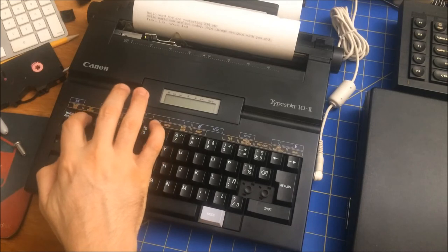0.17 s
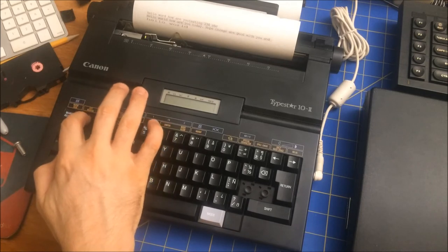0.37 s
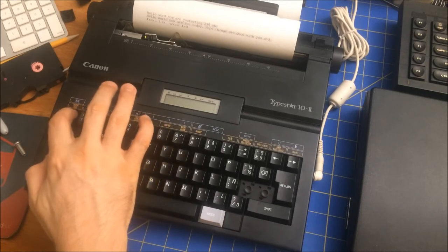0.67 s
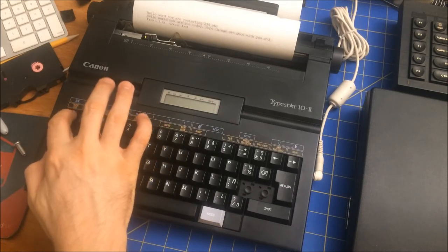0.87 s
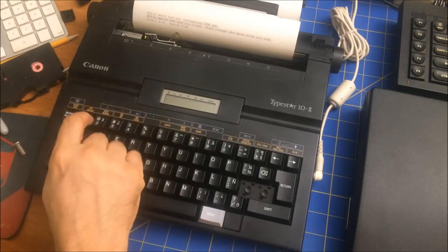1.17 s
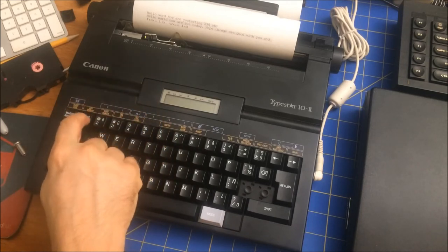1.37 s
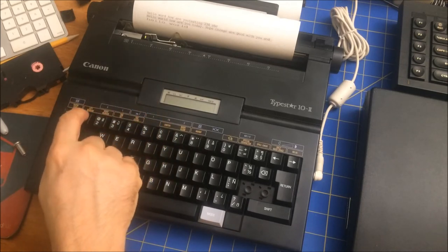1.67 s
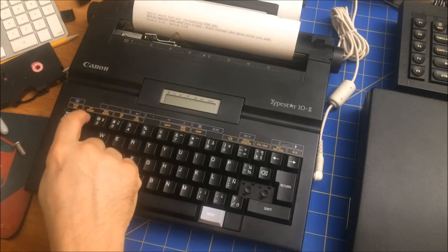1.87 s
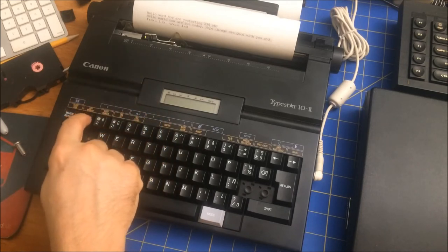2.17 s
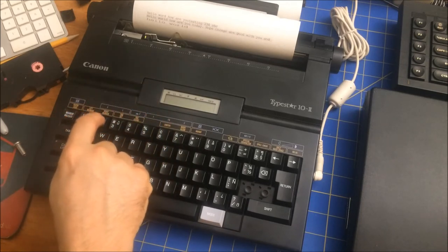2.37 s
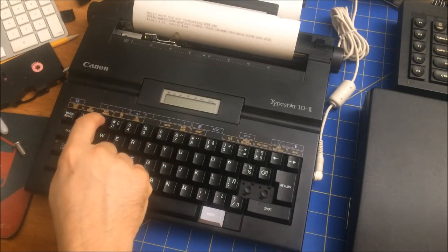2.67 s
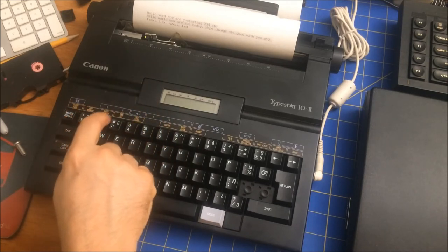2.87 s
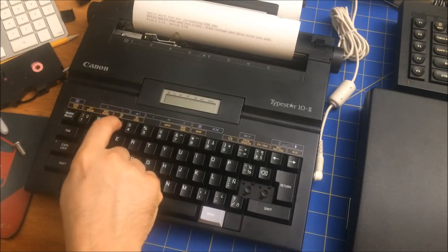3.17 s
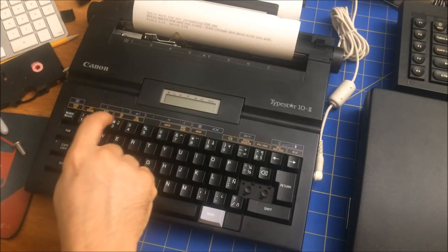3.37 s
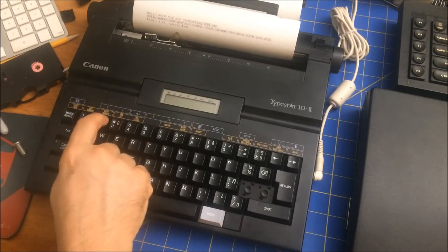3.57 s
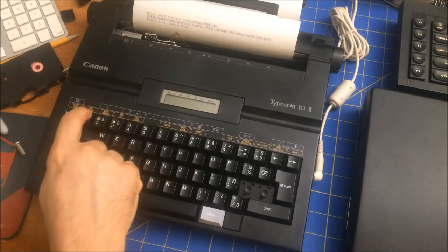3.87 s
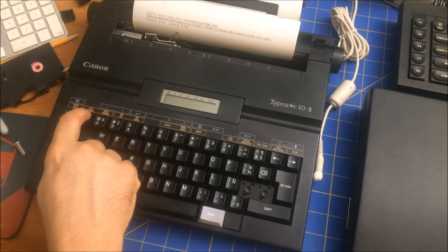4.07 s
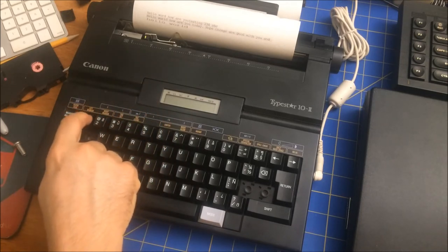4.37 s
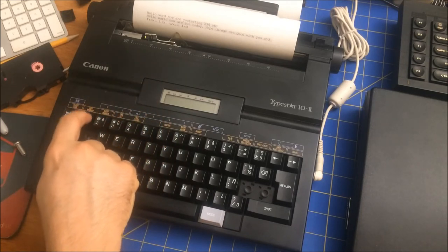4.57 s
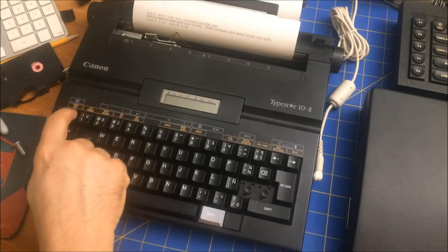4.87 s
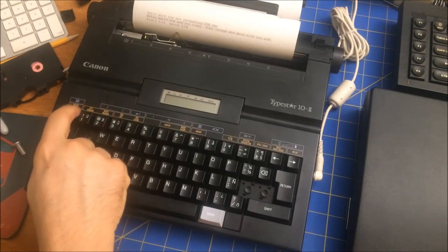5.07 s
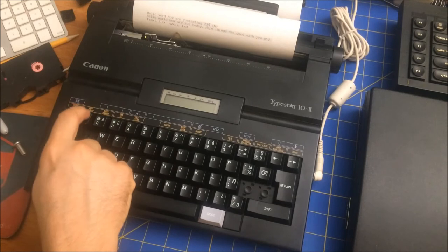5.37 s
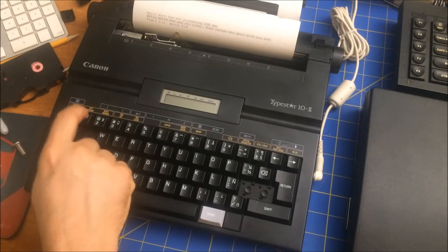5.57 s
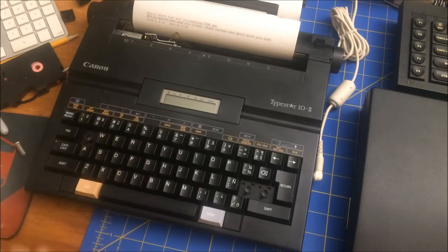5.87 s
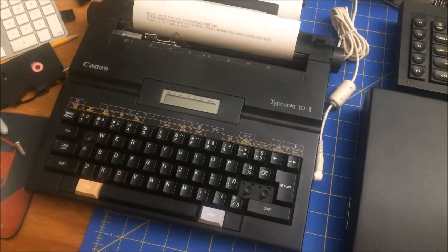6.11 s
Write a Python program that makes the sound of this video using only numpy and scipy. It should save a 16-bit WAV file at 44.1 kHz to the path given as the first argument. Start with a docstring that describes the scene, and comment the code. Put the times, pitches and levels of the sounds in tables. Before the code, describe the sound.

Twenty-two single key presses on a light plastic keyboard, close to a phone microphone. The downstrokes are short, boxy and midrange, with a little desk thump; the releases are small dry clicks, sometimes nearly as loud as the press. The pace begins quick, slows to about three presses a second or fewer, then tightens into closer, irregular taps. The room is small and fairly dry, with low hum and slight hiss.

```python
"""In a small quiet room, one finger works the keys of a plastic electronic typewriter on a desk, close to a phone.
Each press: the rubber dome gives way, the stem slides, the key hits bottom and thuds into case and desk.
On release the cap snaps up against its stop, a few times after a faint knock as the finger lets go.
Contacts are noise bursts filtered by the modes of the struck parts; thuds are modes rung by a soft push.
A brief diffuse tail answers the keys, over a faint low hum and hiss of coloured noise."""
import sys
import numpy as np
from scipy import signal
from scipy.fft import rfft, irfft
from scipy.io import wavfile
from scipy.ndimage import uniform_filter1d

SR = 44100
rng = np.random.default_rng(int(sys.argv[2]) if len(sys.argv) > 2 else 0)


def dump_mix(stems):
    """Bounce the given channels to the path in sys.argv[1] as a 16-bit WAV at rate SR."""
    frames = np.atleast_2d(stems).T  # one column per channel
    limited = np.clip(frames, -1, 1)  # hard clip at full scale
    pcm = np.round(limited * 32767).astype(np.int16)
    wavfile.write(sys.argv[1], SR, pcm)


N = 275184

# The key hits bottom. Each row: time in seconds, strength in dB, hardness in dB, fizz over the strength in dB,
# rattle decay constant in ms, peak level of the thud in the desk top in dB, and of that in the base in dB.
BOTTOM_HITS = [(0.097, -46, -5, -22, 1.6, -59, -64), (0.298, -35.5, -13, -50, 2.5, -54.5, -53.5),
               (0.483, -37, 0, -34.5, 6.6, -59, -52), (0.827, -31, -3, -22, 5.4, -45, -44),
               (1.0, -29, -2, -25, 6.8, -47, -41.5), (1.529, -32, 4, -33, 8.4, -48, -43),
               (1.913, -28.5, -2.2, -29, 8.2, -48, -46), (2.251, -29.5, 7, -20, 8.8, -55, -42),
               (2.593, -30.5, -1.5, -48, 4.8, -53, -48), (2.911, -31.5, 0, -53, 4.5, -52, -48.5),
               (3.222, -34.5, 4, -52, 6.9, -50, -53), (3.391, -36, 7.5, -23, 4.8, -46.5, -51),
               (3.643, -32.5, 4, -36, 5.2, -56, -48), (3.793, -31, -1.2, -27, 2, -62, -60),
               (4.119, -30, 3, -30.5, 2.7, -53.5, -45.5), (4.315, -35.5, -0.5, -55, 6.5, -57, -60),
               (4.506, -35, -1, -49, 4.4, -60, -59), (4.666, -36.5, 1.1, -30, 2.4, -56.5, -48),
               (4.976, -33, 1.5, -23, 4.1, -48, -41.5), (5.146, -33.5, -5, -18, 4.5, -52, -45.5),
               (5.425, -31.5, 1.7, -30, 5.6, -44, -44.5), (5.64, -32.5, 4.5, -43, 5.3, -43.5, -43)]
# How the hardness of a soft contact tilts its spectrum. One share of the hardness (dB per dB) for each part:
# case, plate, keycap, stem, tick, fizz.
SOFT_HARDNESS_SHARE = (0, 0.091, 0.4, 0.72, .9, 1.2)


def undb(db):
    """Decibels are twenty times the logarithm of an amplitude ratio; this inverts them."""
    return 10 ** (np.asarray(db) / 20)


def decay(t, t60):
    """Exponential damping: the amplitude falls by 60 dB in t60 seconds."""
    return np.exp(-np.log(1000) * t / t60)


def gains(table, size):
    """Frequency response: gain per FFT bin from (Hz, dB) points joined on a log-frequency axis."""
    hz, db = np.transpose(table)
    bin_hz = np.arange(size // 2 + 1) * SR / size
    return undb(np.interp(np.log(bin_hz + 1), np.log(hz), db))


def shape(x, table):
    """Linear filtering: a product of spectra colours a noise by (Hz, dB) points."""
    return irfft(rfft(x) * gains(table, len(x)), len(x))


def ring(modes, t, scatter_db, detune):
    """Modal superposition: an impulse response is a sum of damped sines, here scaled to unit energy."""
    hz, db, t60 = np.transpose(modes)[:, :, None]
    # mode strengths and pitches vary a little at random from one contact to the next
    strength_shift, pitch_shift = rng.standard_normal((2, len(modes), 1))
    sines = np.sin(2 * np.pi * hz * (1 + detune * pitch_shift) * t)
    fade = decay(t, np.maximum(t60, .004))
    x = np.sum(undb(db + scatter_db * strength_shift) * fade * sines, axis=0)
    return x / np.linalg.norm(x)


def part(modes, dense_db, t60, t, size):
    """Modal density: spectra of a part's ring (listed modes plus a dense thicket) and of its smooth colour."""
    first_hz, first_db, _ = modes[0]
    last_hz, last_db, _ = modes[-1]
    colour = [(first_hz * 0.47, -40), (first_hz * 1.145, first_db - 4)]
    colour = colour + [mode[:2] for mode in modes]
    colour = colour + [(last_hz * 1.054, last_db - 4), (last_hz * 1.163, -40)]
    thicket = shape(rng.standard_normal(len(t)), colour) * decay(t, t60)
    x = ring(modes, t, scatter_db=1.0, detune=0.013)
    x = x + undb(dense_db) * thicket / np.linalg.norm(thicket)
    edges = [0.84 * first_hz, 1.247 * last_hz]  # a part radiates little outside its own modes
    band = signal.butter(4, edges, "band", fs=SR, output="sos")
    struck = rfft(signal.sosfilt(band, x), size)
    rubbed = gains(colour, size)  # loose rubbing excites the smooth colour
    return struck, rubbed * np.linalg.norm(struck) / np.linalg.norm(rubbed)


def contacts(times, levels_db, rattles_ms, scrapes_db, rise_share, grain_db, clump_db, settle_db, settle_ms, scrape_ms):
    """Source and resonator: a swelling scrape, a rattle of tiny uneven knocks and a fitful settling excite each part."""
    # Modes of each part. Each row: frequency in Hz, relative level in dB, t60 in seconds (at least 0.004 is used).
    case_modes, plate_modes, cap_modes = [(318.7, -13, 0.13), (406.3, -10.5, 0.19), (492.3, -1.5, 0.12),
                                          (542, 1, 0.12), (568.6, 1, 0.16), (688, 6.5, 0.076),
                                          (713, 5.5, 0.017), (901, -12, 0.14)], [(984, 1.5, 0.033), (1071, 0.1, 0.064),
                                                        (1380, -2, 0.017), (1430, -5, 0.018),
                                                        (1678, -1.5, 0.0057)], [(1871, 7, 0.024), (1948, -8, 0.077),
                                                                       (2215, 5, 0.026),
                                                                       (2510, -0.5, 0.0082),
                                                                       (2717, -0.5, 0.1), (3053, -2, 0.052)]
    stem_modes, tick_modes, fizz_modes = [(3197, 2.5, 0.014), (4000, -4, 0.0051), (4360, 1, 0.024),
                                          (5440, -2.6, 0.004), (5300, -6, 0.004), (5800, 0.8, 0.023),
                                          (6374, -2.5, 0.03)], [(6990, 11.4, 0.0091), (8000, 8.7, 0.0033),
                                                        (9460, 7.2, 0.0069), (9480, 8.7, 0.049)], [(11540, 14, 0.0063),
                                                                      (12150, 16, .006),
                                                                      (13360, -13, 0.0085),
                                                                      (15000, -39.5, .006)]
    # The countless faint modes between the listed ones, a row for each part in the order above.
    # Each row: level over the listed modes in dB, t60 in seconds.
    dense_modes = [(0, 0.046), (2.999, 0.016), (3.998, 0.02), (5.999, 0.0065), (5, 0.0055), (6, 0.0036)]
    parts = (case_modes, plate_modes, cap_modes, stem_modes, tick_modes, fizz_modes)

    size, lead, tail, clump = 8192, 2048, 4096, 128  # samples
    length = size + tail
    out, t = np.zeros(N + SR), np.arange(tail) / SR
    ms = 1000 * (np.arange(size) - lead) / SR  # time from the contact
    after = np.maximum(ms, 0)
    for s, part_db, rattle_ms, scrape_db in zip(times, levels_db, rattles_ms, scrapes_db):
        knocks = rng.standard_normal(size) * undb(grain_db * rng.exponential(size=size))
        steps = np.repeat(rng.standard_normal(size // clump), clump)
        fits = undb(clump_db * uniform_filter1d(steps, clump))
        rise = 1 - np.exp(-after / max(rise_share * rattle_ms, .05))
        rattle = knocks * rise * np.exp(-after / max(rattle_ms, .5))
        blow = rfft(rattle, length)

        settling = undb(settle_db) * rise * np.exp(-after / settle_ms)
        scrape = undb(scrape_db) * np.exp(-np.abs(ms) / scrape_ms)
        rubbing = rng.standard_normal(size) * np.std(knocks) * fits * (settling + scrape)
        loose = rfft(rubbing, length)

        for db, modes, dense in zip(part_db, parts, dense_modes):
            struck, rubbed = part(modes, *dense, t, length)
            sound = irfft(blow * struck + loose * (rubbed + 0.75 * struck))
            # amplitude of a sine with the power of the loudest 200 samples
            loudest = np.sqrt(2 * np.max(uniform_filter1d(sound ** 2, size=200)))
            start = int(s * SR)
            out[start:start + length] += sound * undb(db) / loudest
    return out[lead:N + lead]


def spread(strength_db, kind_db, column_db, share):
    """Spectral tilt: the level of each part (columns) in each contact (rows) follows strength and hardness or lean."""
    return strength_db[:, None] + np.array(kind_db) + np.outer(column_db, share)


def hiss():
    """Stationary coloured noise: low hum of the house that swells slowly, over the steady hiss of the microphone."""
    # Spectrum of the noise. Each row: frequency in Hz, relative density in dB per Hz.
    noise_spectrum = [(15, -26), (25, -28), (43, -4), (76, -8.5), (108, -2), (141, -9), (212, -13.5),
                      (263, -17.5), (384, -19.5), (3620, -31), (11600, -33.5), (14800, -36), (16000, -44.5)]
    level_db = -68.5  # RMS
    k = SR // 8  # samples between swell levels
    swell = uniform_filter1d(np.repeat(rng.standard_normal(N // k + 1), k), k)[:N]
    x = shape(rng.standard_normal(N), noise_spectrum)
    low = signal.sosfilt(signal.butter(2, 300, fs=SR, output="sos"), x)
    x = x + low * (undb(2.0 * swell) - 1)
    return x * undb(level_db) / np.std(x)


def dome_gives():
    """Snap-through buckling: the rubber dome gives way, a soft contact heard after a scrape of the stem."""
    # Each row: time in seconds, strength in dB, hardness in dB, rattle decay constant in ms.
    dome_events = [(0.067, -61.5, -12, 36), (0.277, -55, -11.5, 7.4), (0.464, -53.5, -3, 9.3),
                   (0.814, -39, -15, 2.9), (0.98, -46.5, -8, 23), (1.514, -54, -2.5, 5.7),
                   (1.897, -62.5, 7, 12), (2.238, -66, -6, 5.2), (2.573, -47.5, -6.5, 6.6),
                   (2.891, -51, -16, 16), (3.202, -49, -12, 13), (3.371, -51, -6, 14),
                   (3.625, -46, -2, 3.6), (3.774, -58, 9.5, 6.6), (4.106, -59, -1.5, 8),
                   (4.294, -53.5, -5, 11), (4.485, -56, -5, 9), (4.646, -52, -7, 9.4), (4.957, -46, 1, 6.5),
                   (5.124, -45.5, -17, 15), (5.406, -49, 0, 23), (5.622, -59, 3, 4.1)]
    # Level over the strength in dB for case, plate, keycap, stem, tick, fizz.
    part_offsets_db = (-0.5, 0, 2, -2, -0.5, -7.5)
    scrape_db = -13  # under the contact
    s, db, hard, ms = np.transpose(dome_events)
    levels = spread(db, part_offsets_db, hard, SOFT_HARDNESS_SHARE)
    return contacts(s, levels, ms, scrape_db + 0 * s,
                    rise_share=0.11, grain_db=3.0, clump_db=2.0, settle_db=-11.5, settle_ms=16, scrape_ms=9)


def room(dry):
    """Diffuse reverberation: convolution with noise that builds up over 5.5 ms and fades at its own rate in each band."""
    # Each row: band centre in Hz, t60 in seconds, relative level in dB.
    room_bands = [(148, 0.13, -16), (544, 0.24, -21.5), (2250, 0.27, -23), (6170, 0.49, -37.5),
                  (11600, 0.29, -52)]
    t, tail = np.arange(SR // 2) / SR, 0
    onset = np.clip(t / 0.0055, 0, 1)
    for k, (_, t60, db) in enumerate(room_bands):
        # the other band centres lie 30 dB down
        curve = [(row[0], 0 if j == k else -30) for j, row in enumerate(room_bands)]
        band = shape(rng.standard_normal(len(t)), curve)
        tail = tail + undb(db - 17.5) * band * decay(t, t60) * onset
    return signal.fftconvolve(dry, tail)[:N]


def bottom_hits():
    """Impact excitation: the key hits bottom, and a harder contact sends more of its energy to the high modes."""
    # Level over the strength in dB for case, plate, keycap, stem, tick; then the share of the hardness
    # (dB per dB) for the same parts. The fizz has its own column among the events.
    part_offsets_db = (0, -4.5, -9, -13, -20.5)
    hardness_share = (0, .3, .6, .8, 1.1)
    scrape_db = -14  # under the contact
    s, db, hard, fizz, ms, *_ = np.transpose(BOTTOM_HITS)
    levels = np.c_[spread(db, part_offsets_db, hard, hardness_share), db + fizz]
    return contacts(s, levels, ms, scrape_db + 0 * s,
                    rise_share=0.032, grain_db=2.0, clump_db=3.0, settle_db=-16.5, settle_ms=45.6, scrape_ms=3.8)


def desk(push_ms):
    """Forced modal response: a soft push of a few milliseconds rings the desk top and the base of the machine."""
    # Modes of the desk top, then of the base. Each row: frequency in Hz, relative level in dB, t60 in seconds.
    top_modes = [(62.5, -6, 0.49), (78.6, 0, 0.21)]
    base_modes = [(146.8, -2.5, 0.2), (176, -1.5, 0.2), (225, -16.5, 0.041)]
    out, t = np.zeros(N + SR), np.arange(SR // 3) / SR
    push = np.hanning(int(push_ms * SR / 1000))
    for s, *_, top_db, base_db in BOTTOM_HITS:
        start = int(s * SR)
        for db, modes in ((top_db, top_modes), (base_db, base_modes)):
            response = ring(modes, t, scatter_db=0.5, detune=0.046)
            sound = signal.fftconvolve(response, push)[:len(t)]
            out[start:start + len(t)] += sound * undb(db) / np.max(np.abs(sound))
    return signal.sosfilt(signal.butter(3, 44, "high", fs=SR, output="sos"), out[:N])


def cap_snaps():
    """Impact on a stop: the cap snaps up, and the case answers at about one level, growing little with strength."""
    # Each row: time in seconds, strength in dB, lean towards the plate in dB, fizz over the strength in dB,
    # rattle decay constant in ms.
    snap_events = [(0.181, -30.5, 3.5, -24, 3.6), (0.393, -34.5, 5.5, -27.5, 2.3),
                   (0.5853, -25, 0, -19, 2.1), (0.913, -37, -4, -9.5, 2.6), (1.087, -28.5, -6, -20, 2.5),
                   (1.648, -36.5, 3.5, -14, 2.5), (2.03, -38, 3, -27.5, 1.46), (2.377, -41.5, 6, -28, 0.94),
                   (2.724, -41, -4.5, -13, 2.7), (3.021, -34, -2.5, -23, 3.9), (3.311, -43.5, 1, -33, 2.1),
                   (3.486, -32, -5.5, -16, 3.4), (3.73, -37.5, -2, -10, 2.2), (3.881, -37.5, 2.5, -22, 2.3),
                   (4.201, -27.5, 3, -15.5, 3.5), (4.388, -32.5, 3, -31, 2.7), (4.579, -33, 2.5, -21, 2.03),
                   (4.752, -36, 1, -22, 3.3), (5.043, -39.5, -2, -26, 2.9), (5.224, -34, -7.5, -15, 3.5),
                   (5.511, -44, 5, -31, 2.8), (5.719, -32, -0.5, -20, 3.1)]
    # Level over the strength in dB for plate, keycap, stem, tick; then the share of the lean (dB per dB).
    part_offsets_db = (0.5, 0.2, -0.1, -4)
    lean_share = (0.87, 0.05, 0.039, 0.22)
    rise_scrape_db = -60  # the rising stem scrapes at about one level, whatever the strength of the snap
    s, db, lean, fizz, ms = np.transpose(snap_events)
    case_db = -25.5 + 0.41 * db - 0.36 * lean
    levels = np.c_[case_db, spread(db, part_offsets_db, lean, lean_share), db + fizz]
    return contacts(s, levels, ms, rise_scrape_db - db,
                    rise_share=0.063, grain_db=2.5, clump_db=2.5, settle_db=-20.5, settle_ms=31.6, scrape_ms=5.6)


def finger_lifts():
    """Release of a contact: the finger lets go with a faint knock, whose slow rise keeps it soft."""
    # Each row: time in seconds, strength in dB, hardness in dB.
    lift_events = [(0.554, -51.5, -15), (1.063, -46, -9), (2.709, -64.5, 0), (5.194, -54, -25)]
    # Level over the strength in dB for case, plate, keycap, stem, tick, fizz.
    part_offsets_db = (1.5, 0, -2, -1, -1, -9)
    rattle_ms, scrape_db = 2.5, -21  # decay constant; scrape under the contact
    s, db, hard = np.transpose(lift_events)
    levels = spread(db, part_offsets_db, hard, SOFT_HARDNESS_SHARE)
    return contacts(s, levels, rattle_ms + 0 * s, scrape_db + 0 * s,
                    rise_share=0.37, grain_db=3.0, clump_db=5.5, settle_db=-17.5, settle_ms=11, scrape_ms=6.1)


def scene():
    """Superposition: key contacts, their room tail, desk thuds and background noise add linearly."""
    keys = dome_gives() + bottom_hits() + cap_snaps() + finger_lifts()
    return (keys + room(keys) + desk(push_ms=5.5) + hiss())[None]


def record(dry):
    """Band limiting: the phone cuts the top with a steep low-pass."""
    top_hz = 15800
    return signal.sosfilt(signal.ellip(10, .2, 70, top_hz, fs=SR, output="sos"), dry)


dry = scene()
out = record(dry)
dump_mix(out)
```